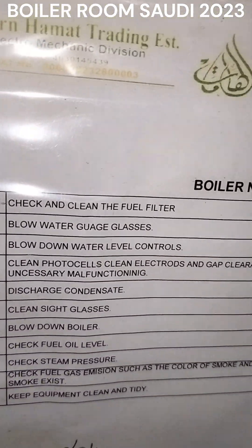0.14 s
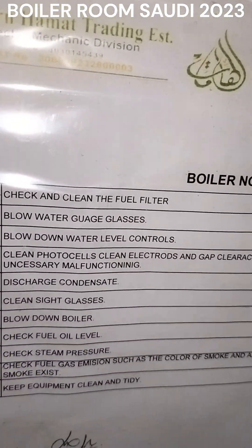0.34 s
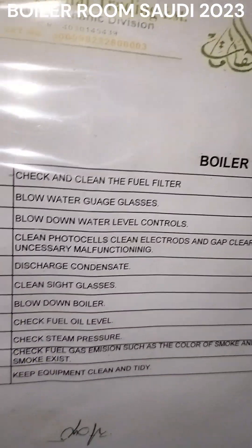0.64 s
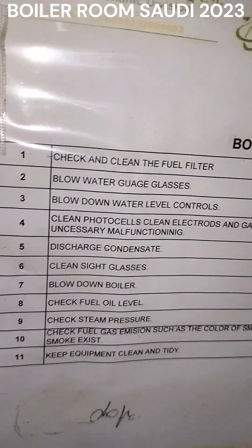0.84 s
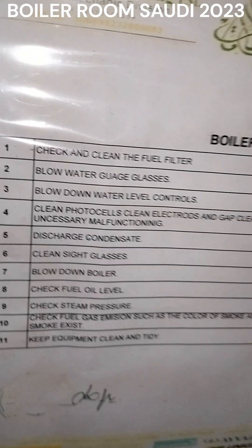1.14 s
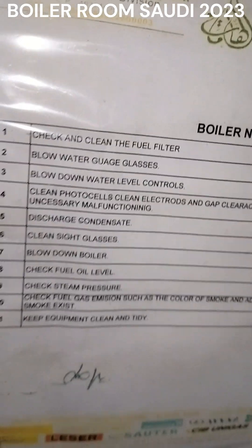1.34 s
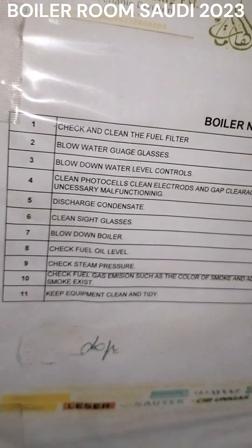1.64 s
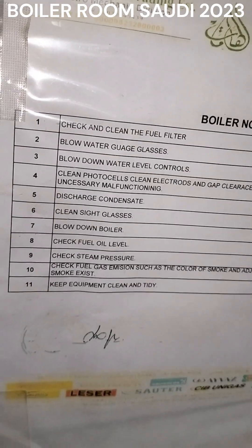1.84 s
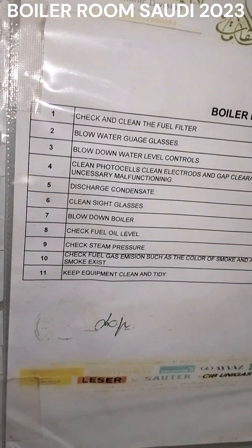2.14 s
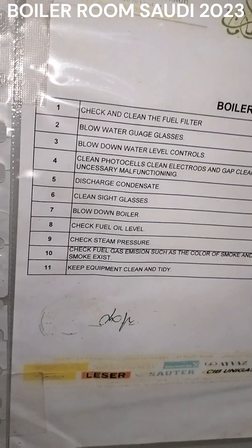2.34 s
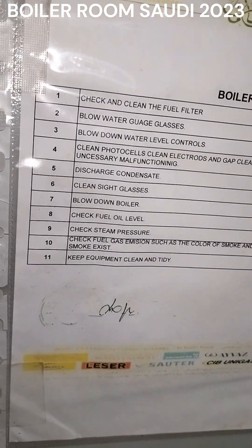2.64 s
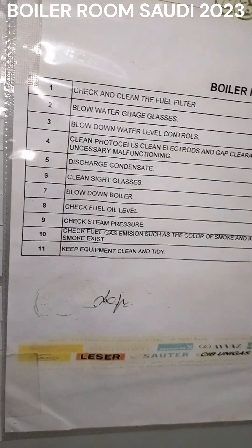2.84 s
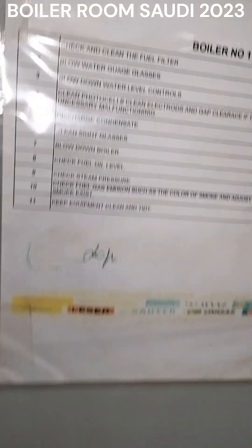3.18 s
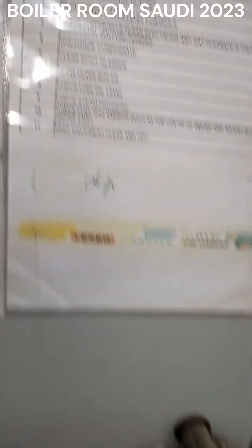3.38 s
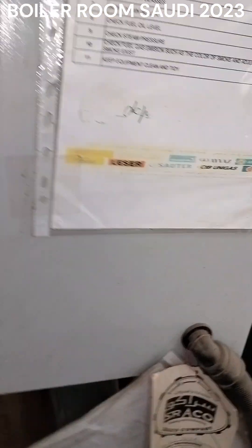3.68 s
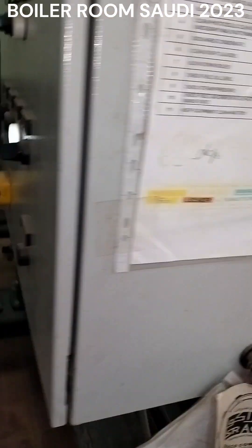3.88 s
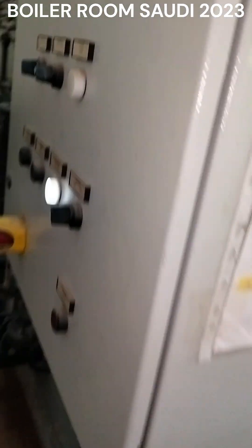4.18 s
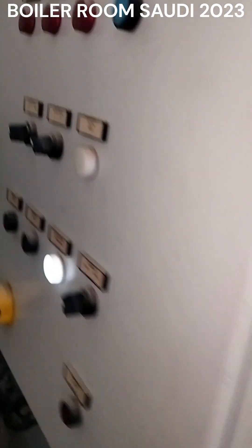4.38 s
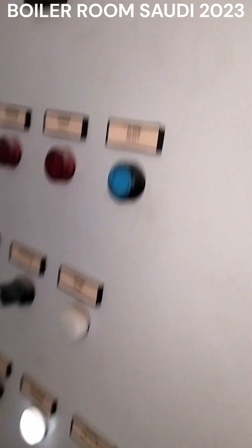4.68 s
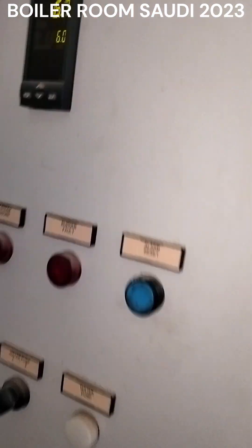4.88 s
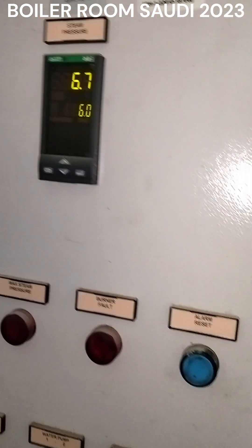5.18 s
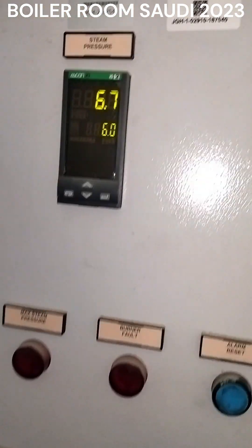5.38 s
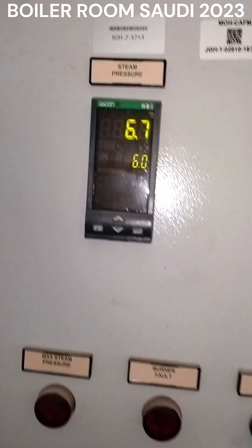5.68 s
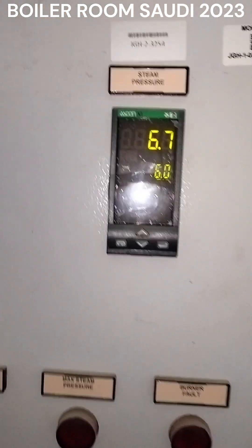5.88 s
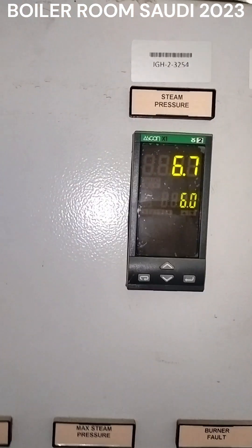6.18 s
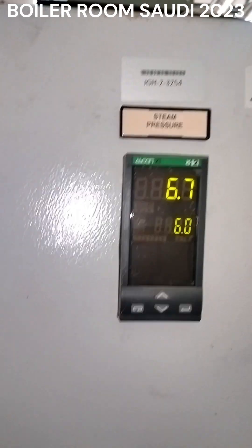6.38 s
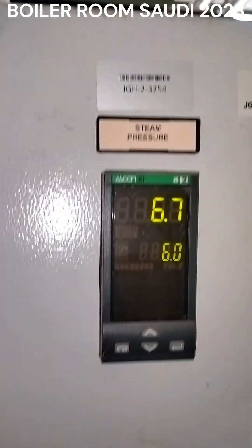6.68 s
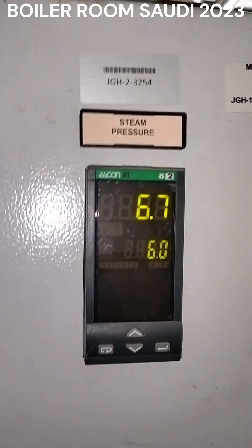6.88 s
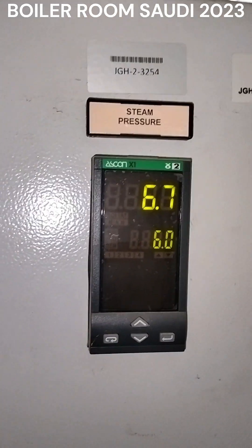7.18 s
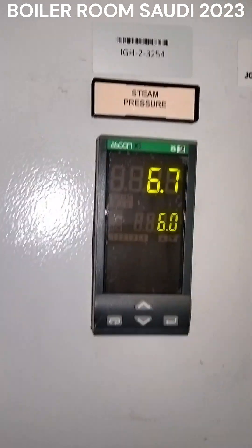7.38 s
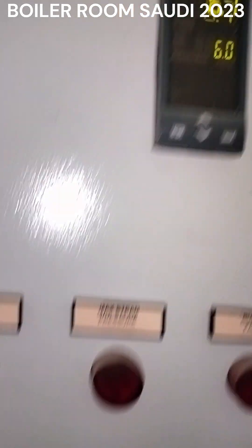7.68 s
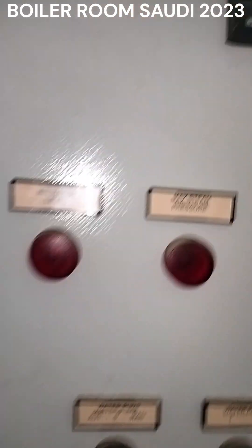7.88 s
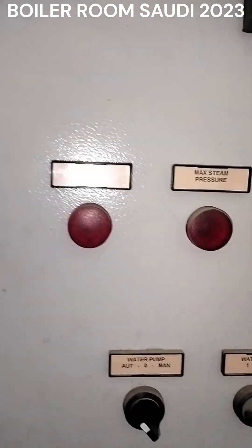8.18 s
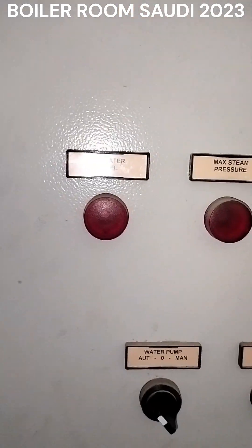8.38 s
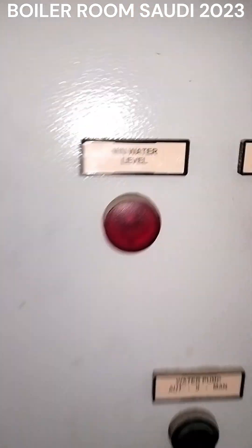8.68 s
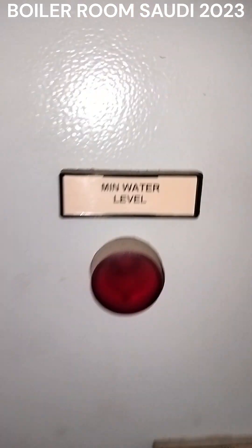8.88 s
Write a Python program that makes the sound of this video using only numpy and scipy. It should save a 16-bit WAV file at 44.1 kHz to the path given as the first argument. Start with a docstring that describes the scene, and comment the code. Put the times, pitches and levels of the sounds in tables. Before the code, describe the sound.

Close, moving stereo pickup in a boiler room: dense, broad burner roar with fluttering rumble, steady motor tones, faint buzz and a piercing whine that drifts between left and right. Just after four seconds, steel thumps, rings and clatters for a fraction of a second, mixed with a scratchy hiss. Its tail sinks quickly into the unbroken machinery noise, which continues to the end.

```python
"""Boiler room along the control cabinet

A steam boiler runs in a hard-walled room, heard from a microphone that moves along its control cabinet.
The burner roars as shaped noise; a blower whines and buzzes, and motors and pumps hum as sine tones
that swell and fade in the room's standing waves. Halfway through, sheet steel clunks and rattles once
as struck decaying modes and noisy clatter, with a short rasping hiss of noise and ticks amid it."""
import sys
import numpy as np
from scipy import signal
from scipy.fft import rfft, irfft
from scipy.io import wavfile
from scipy.ndimage import uniform_filter1d

SR = 44100
rng = np.random.default_rng(int(sys.argv[2]) if len(sys.argv) > 2 else 0)


def to_wav(sig):
    """Store sig (one row per channel, or 1-D mono) as 16-bit WAV at the path in sys.argv[1].

    Samples outside -1..1 are clipped; the rate is SR.
    """
    pcm = np.clip(np.atleast_2d(sig), -1, 1) * 32767
    pcm = np.round(pcm).astype(np.int16)
    wavfile.write(sys.argv[1], SR, pcm.T)  # frames by channels


N = 398223
T = np.arange(N) / SR
PORT_GAP_M = 0.19  # distance between the two microphone ports


def gain_of(db):
    """Decibels to amplitude."""
    return 10 ** (np.asarray(db) / 20)


def evened(x):
    """Scales a signal to an rms of one."""
    return x / np.sqrt(np.mean(abs(x) ** 2) + 1e-20)


def read(points, hz):
    """Reads a spectrum table on a log-frequency axis."""
    f, value = np.transpose(points)
    return np.interp(np.log(hz + 1), np.log(f + 1), value)


def curve(rows, axis):
    """One column of a time table, at every sample."""
    rows = np.array(rows)
    return np.interp(T, rows[:, 0], rows[:, axis])


def add(mix, s, sound):
    """Mixes a stereo sound in at time s."""
    part = mix[:, round(s * SR):][:, :sound.shape[1]]
    part += sound[:, :part.shape[1]]


def drift(rate):
    """Smooth random wander of rms one; its spectrum falls away above rate in Hz."""
    points, points_per_s = 2048, 200
    f = np.fft.rfftfreq(points, 1 / points_per_s)
    spectrum = rfft(rng.standard_normal(points)) / (1 + (f / rate) ** 2)
    slow = evened(irfft(spectrum))
    return np.interp(T, np.arange(points) / points_per_s, slow)


def likeness(hz):
    """Sound from all sides is alike at the two ports only when its waves are longer than their gap."""
    speed_m_s = 343
    alike = .98 * np.sinc(2 * hz * PORT_GAP_M / speed_m_s)
    return np.clip(alike / (1 + (hz / 2500) ** 2), -1, 1)


def diffuse(spectrum, ripple_db):
    """Stereo noise filling the room; the room's many modes ripple its spectrum."""
    hz = np.fft.rfftfreq(N, 1 / SR)
    a, b = rfft(rng.standard_normal((2, N)))
    same = likeness(hz)
    grid = np.arange(0, 8000, 14)  # Hz between ripple points

    def rippled(z):
        """Gives the spectrum random bumps, shallower in the bass."""
        bumps = np.interp(hz, grid, rng.standard_normal(len(grid)))
        return z * gain_of(ripple_db * bumps * hz / (hz + 400))

    mid = rippled(a * np.sqrt(1 + same))
    side = rippled(b * np.sqrt(1 - same))
    ports = np.array([mid + side, mid - side])
    return evened(irfft(ports * gain_of(read(spectrum, hz)), N))


# the burner's roar, spectrum shape only: pitch_hz, density_db (relative, per Hz)
ROAR_SPECTRUM = [(12, -52), (25, -44), (55, -27.5), (100, -16), (165, -5), (270, -0.5), (350, -5.5),
                 (1000, -4), (1450, -5.5), (1950, -15), (2650, -12.5), (3250, -16.5), (3600, -14.5),
                 (4200, -20.5), (4520, -27.5), (5100, -28), (5750, -31), (6500, -48.5), (7400, -61)]
# how much louder the roar is on the left than the right: pitch_hz, lean_db
ROAR_LEAN_BY_PITCH = [(100, 1), (600, 0.9), (1200, 3), (2000, 4), (2600, 1.5), (3500, 3.5), (4400, -0.5),
                      (5200, 1), (6400, -10.5)]
# slow changes of the roar along the cabinet: time_s, rumble_db, rush_db
ROAR_ALONG_PATH = [(0, 1, 0), (1, 2, .5), (2, 0.5, -0.1), (3.5, -.5, 0), (4.8, 0, 0), (5.4, 0, -0.9),
                   (6.2, -1, 0), (7.2, 0.5, -.5), (8.1, -1.5, -0.5), (9, 0, -0.7)]


def burner(level_db=-21.5, flutter_db=-0.5, colour_db=1.72):
    """The flame's rumble flutters under the even rush of air; standing waves slowly recolour the lower part."""
    hz, s, z = signal.stft(diffuse(ROAR_SPECTRUM, ripple_db=0.54), SR, nperseg=2048)
    hz = hz[:, None]
    at = np.minimum(np.round(s * SR).astype(int), N - 1)  # sample at each frame

    low = 1 / (1 + (hz / 380) ** 4)  # share of rumble against rush
    rumble_db = curve(ROAR_ALONG_PATH, axis=1) + flutter_db * drift(9.5)
    rush_db = curve(ROAR_ALONG_PATH, axis=2)

    # random patches, smoothed across pitch and then across time
    patches = rng.standard_normal(z.shape[1:])
    patches = uniform_filter1d(patches, size=4, axis=0)
    patches = evened(uniform_filter1d(patches, size=36, axis=1))

    db = low * rumble_db[at] + (1 - low) * rush_db[at]
    db = db + colour_db * patches / (1 + hz / 2500)
    lean_db = np.array([.5, -.5])[:, None, None] * read(ROAR_LEAN_BY_PITCH, hz)
    roar = signal.istft(z * gain_of(db + lean_db), SR, nperseg=2048)[1][:, :N]
    return gain_of(level_db) * roar


def room_tone(hz, fade_rate):
    """A steady tone whose level and phase wander at each port as it crosses the standing waves."""
    turn = 2 * np.pi * hz * T
    cos, sin = np.cos(turn), np.sin(turn)

    def wandering():
        """The tone with independently drifting cosine and sine parts."""
        return evened(evened(drift(fade_rate)) * cos + evened(drift(fade_rate)) * sin)

    mid = wandering() * np.sqrt((1 + likeness(hz)) / 2)
    side = wandering() * np.sqrt((1 - likeness(hz)) / 2)
    return np.array([mid + side, mid - side])


# lesser tones of the motors, pumps and pipes: pitch_hz, level_db (rms)
LESSER_TONES = [(152.1, -50), (176.3, -42.5), (188.4, -44.5), (321.5, -44.5), (388.5, -44.5), (421, -47),
                (600.2, -44), (617.7, -40.5), (823.6, -57), (1271.8, -43), (1306.8, -43), (1325.6, -40.5),
                (1362.0, -39), (1388, -46), (1415.8, -46.5), (1453.5, -41.5), (1545.0, -50.5),
                (1561.2, -50), (1816.9, -46.5), (1908.4, -48.5), (2061.8, -54), (2527.5, -45.5),
                (2643.2, -49), (3528.8, -52)]


def machines():
    """The many lesser tones of motors, pumps and pipes, each wandering in the standing waves."""
    return sum(gain_of(db) * room_tone(hz, fade_rate=2.58) for hz, db in LESSER_TONES)


# stronger machine tones along the path: pitch_hz, then a list of time_s, level_db (rms, before waver)
SWELLING_TONES = [(239.6, [(0.15, -34), (1.4, -33.5), (2.0, -39.5), (3.0, -32.5), (4.3, -53.5),
                  (6.2, -29.5), (7.0, -42.5), (8.0, -32), (9.0, -46)]), (265.1, [(0.0, -38), (0.9, -35.5),
                  (1.5, -30.5), (2.1, -38.5), (4.3, -39.5), (5.5, -46), (7.4, -36.5), (8.4, -31.5),
                  (9.0, -35)]), (359.3, [(0.0, -45), (1.8, -43.5), (2.35, -34), (2.7, -44), (4.0, -43),
                  (5.0, -43.5), (9.0, -44)]), (478.0, [(4.6, -59), (4.95, -40.5), (5.15, -40), (5.5, -56)]),
                  (508.7, [(0.0, -42), (2.0, -40.5), (4.8, -39), (5.25, -35.5), (5.55, -45), (6.3, -40.5),
                  (6.8, -37.5), (7.5, -49), (9.0, -45.5)]), (528.9, [(0.0, -44), (0.4, -44), (0.67, -33.5),
                  (0.9, -43), (1.2, -42), (1.45, -34.5), (2.3, -49), (8.2, -47.5), (9.0, -40.5)]),
                  (628.5, [(0.0, -40.5), (1.3, -36.5), (2.5, -34.5), (3.4, -35), (4.1, -43), (4.6, -33.5),
                  (5.4, -51), (6.05, -32), (6.7, -35.5), (7.4, -44.5), (9.0, -41)])]


def swelling(waver_db=2.04, wander=1.0, spread=0.92):
    """The stronger machine tones waver in level and phase; the shorter their waves, the more the ports differ."""
    out = np.zeros((2, N))
    for hz, path in SWELLING_TONES:
        turn = 2 * np.pi * hz * T + wander * drift(2)
        apart = spread * np.sqrt((1 - likeness(hz)) / 2) * drift(0.56)  # radians
        level = gain_of(curve(path, axis=1) + waver_db * drift(8))
        out += level * evened(np.sin([turn + apart, turn - apart]))
    return out


# the pump's hum along the path: time_s, level_db (before trim and waver)
PUMP_ALONG_PATH = [(0.0, -26), (0.28, -30), (0.43, -26), (0.65, -37), (1.0, -31), (1.26, -46), (2.2, -43),
                   (2.62, -31.5), (3.33, -34.5), (4.04, -27.5), (4.55, -31.5), (5.25, -35.5), (5.7, -39),
                   (6.0, -33.5), (7.09, -28), (7.7, -31), (8.1, -26.5), (8.4, -32.5), (8.58, -26.5),
                   (8.76, -39.5), (8.98, -27.5)]
# the motor's drone along the path: time_s, level_db (before trim)
DRONE_ALONG_PATH = [(0.0, -57), (0.65, -58), (1.76, -45), (3.19, -59), (5.03, -48.5), (7.55, -63.5),
                    (9.02, -53)]
HUM_HZ, DRONE_HZ = 205.9, 88.8


def hum(pump_trim_db=-0.5, drone_trim_db=-0.5, waver_db=0.8):
    """A pump's vanes hum, wavering a little, over a motor's deeper drone; their long waves swell and fade."""
    pump_level = gain_of(curve(PUMP_ALONG_PATH, axis=1) + pump_trim_db + waver_db * drift(5))
    pump = pump_level * evened(np.sin(2 * np.pi * HUM_HZ * T + 0.22 * drift(2.2)))
    drone_level = gain_of(curve(DRONE_ALONG_PATH, axis=1) + drone_trim_db)
    drone = drone_level * evened(np.sin(2 * np.pi * DRONE_HZ * T + .3 * drift(0.86)))
    return (pump + drone) * gain_of([[.4], [-.4]])  # slightly to the left


# the blower's whine in the standing waves along the path:
# time_s, level_db (before trim and flutter), left_minus_right_db, left_lead_cycles
WHINE_ALONG_PATH = [(0.0, -39, 15, 0.077), (0.36, -25, 8.5, -0.39), (1.0, -22.5, 4.5, -0.24),
                    (1.4, -29.5, 2, -0.13), (1.95, -31, 3, -0.13), (2.45, -31.5, 0, -0.33),
                    (2.65, -26, 1, -0.25), (2.93, -25, 1.5, -0.22), (3.35, -26, -3, -0.22),
                    (3.79, -33, 1, -0.1), (3.93, -22.5, 4, 0.2), (4.08, -28, 7, 0), (4.35, -35.5, 3, 0.1),
                    (4.58, -27, 0, 0.25), (4.69, -44, 0, -0.09), (4.78, -25, 5, -0.18),
                    (4.89, -25, -2, 0.13), (5.05, -36, -7, 0.19), (5.21, -24, -6, 0.29),
                    (5.52, -33, -5.5, 0.33), (5.85, -26.5, 0.5, -0.093), (6.17, -31, 0, 0.27),
                    (6.7, -24, 10, -0.39), (6.97, -26.5, 12, -0.33), (7.45, -28.5, 18, -0.61),
                    (7.75, -27.5, 21, -0.9), (8.04, -23, -3.5, -0.75), (8.35, -24, 1, -0.76),
                    (8.6, -22.5, -2, -0.62), (8.85, -33, -4, -0.83), (9.02, -34, -2, -0.9)]
WHINE_HZ = 1296.2


def whine(trim_db=0.1, flutter=0.036, flutter_db=0.3):
    """The blower's blade tone, shaken by turbulent air; the standing waves share it out between the ports."""
    turn = 2 * np.pi * WHINE_HZ * T + .5 * drift(0.57)
    lean_db = curve(WHINE_ALONG_PATH, axis=2)
    lead = 2 * np.pi * curve(WHINE_ALONG_PATH, axis=3)  # radians
    share = gain_of([lean_db / 2, -lean_db / 2])
    share = share / np.sqrt(np.mean(share ** 2, axis=0))  # leaning leaves the total power alone
    ports = np.array([evened(np.sin(turn + side * lead / 2 + flutter * drift(11))) for side in (1, -1)])
    level = gain_of(curve(WHINE_ALONG_PATH, axis=1) + trim_db + flutter_db * drift(21))
    return level * share * ports


SHAFT_HZ = 29.61


def fan_buzz(level_db=-39, centre_hz=2400, octaves=0.42):
    """The uneven fan wheel repeats the same rush of air at every turn: a comb of shaft orders."""
    orders = np.arange(1, 2049)
    order_hz = orders * SHAFT_HZ
    bell = np.exp(-.5 * (np.log2(order_hz / centre_hz) / octaves) ** 2)
    shape = bell * gain_of(read(ROAR_SPECTRUM, order_hz))
    turns = SHAFT_HZ * T + 0.0015 * drift(0.93)
    out = np.zeros((2, N))
    for ear in (0, 1, 0, 1):  # two slowly fading patterns per side
        chance = rng.standard_normal(len(orders)) + 1j * rng.standard_normal(len(orders))
        one_turn = evened(irfft(np.r_[0, shape * chance]))
        place = np.arange(len(one_turn)) / len(one_turn)
        out[ear] += drift(0.59) * np.interp(turns % 1, place, one_turn)
    return gain_of(level_db) * evened(out) * gain_of([[1], [-1]])


# blows on the sheet steel, levels relative:
# start_s, thump_db (low modes), thump_pitch_hz (favoured), ring_db (high modes), ring_pitch_hz (favoured),
# clatter_db
STEEL_BLOWS = [(4.34, -8, 259, -24, 900, -20), (4.349, -13.5, 380, -3, 950, -16),
               (4.356, -16, 400, -7, 1300, -17), (4.366, -13, 450, -18, 2100, -19),
               (4.384, -10, 100, -23, 1400, -28), (4.392, -16.5, 300, -17, 1300, -23.5),
               (4.406, -11, 129, -12, 1100, -23), (4.441, -19, 151, -21, 1700, -29),
               (4.466, -9, 240, -19, 1700, -32), (4.499, -21, 400, -21, 1410, -37),
               (4.524, -30, 400, -18.5, 1300, -29), (4.552, -18, 300, -19.5, 1250, -29)]
# modes the steel rings with: pitch_hz (before detuning), level_db (relative), t60_s
STEEL_MODES = [(109, -6, 0.26), (163, -7, 0.19), (226.7, -8.5, 0.44), (265.4, 4.5, 0.18), (288, -8, 0.91),
               (396.4, -1.5, 0.27), (470, -7.5, 0.15), (646, -15, 0.09), (812, -6.5, 0.047),
               (954, -7, 0.072), (1083, -3, 0.084), (1310, -8, 0.068), (1397, -6, 0.17), (1680, -4.5, 0.15),
               (1796, -5, 0.23), (2500, -9, 0.2)]
# the clatter of each blow, spectrum shape only: pitch_hz, density_db (relative, per Hz)
CLATTER_SPECTRUM = [(40, -34), (55, -25), (90, 0), (300, 0), (550, -7), (1000, -5), (1750, -1.5),
                    (2000, -3.5), (2400, -6), (2900, -13), (4200, -14), (6000, -39), (7000, -58)]
THUMP_BELOW_HZ = 500  # modes below this thump, the others ring


def favoured(hz, centre_hz, octaves):
    """Weights a mode by how near it lies to the pitch that the struck place favours."""
    return 1 / np.hypot(1, np.log2(hz / centre_hz) ** 2 / octaves ** 2)


def clunk(modes_db=-4, clatter_t60=0.29, room_db=-12, room_t60=2.1, rise_s=0.0044, uneven_db=-0.5,
          lean_db=2.0, thump_octaves=0.41, ring_octaves=0.8, detune=0.0068, rattle_db=2.0):
    """A steel panel is struck and rattles back; heavy blows thump, hard ones ring, each favouring other modes."""
    t, out = T[:SR], np.zeros((2, N))
    clatter = diffuse(CLATTER_SPECTRUM, ripple_db=2.5) * evened(gain_of(rattle_db * drift(60)))
    # a quick fall, then the quieter, slower tail of the room
    fall = np.hypot(gain_of(-60 * t / clatter_t60), gain_of(room_db - 60 * t / room_t60))
    lean = gain_of([[lean_db], [-lean_db]])
    for k, (s, thump_db, thump_hz, high_db, high_hz, hard_db) in enumerate(STEEL_BLOWS):
        noise = clatter[:, k * SR // 2:][:, :SR]  # a different stretch for each blow
        blow = gain_of(hard_db) * lean * fall * noise
        for hz, mode_db, t60 in STEEL_MODES:
            mode_hz = hz * (1 + detune * rng.standard_normal())
            phase = rng.random((2, 1)) * (1 - likeness(hz)) / 2  # cycles, one per port
            tone = np.sin(2 * np.pi * (mode_hz * t + phase))
            if hz < THUMP_BELOW_HZ:
                force = gain_of(thump_db) * favoured(hz, thump_hz, thump_octaves)
            else:
                force = gain_of(high_db) * favoured(hz, high_hz, ring_octaves) * lean
            decay_db = modes_db + mode_db + uneven_db * rng.standard_normal() - 60 * t / t60
            blow = blow + force * gain_of(decay_db) * tone
        add(out, s, (1 - np.exp(-t / rise_s)) * blow)
    return out


# the hiss during the clunk, spectrum shape only: pitch_hz, density_db (relative, per Hz)
HISS_SPECTRUM = [(300, -24), (1650, 1.5), (2000, 2), (2450, 4), (2900, -3), (3600, 1.5), (4200, -4),
                 (4800, -10), (5800, -12.5), (6400, -27), (7000, -43)]
# sharp ticks within the rasp: start_s, level_db (before the lean to the left)
RASP_TICKS = [(4.376, -21), (4.4095, -20), (4.424, -18), (4.4495, -15)]


def hiss(peak_s=4.44, level_db=-21, rise_s=0.053, t60=0.55, tick_t60=0.015):
    """A short rasp with a few ticks; it swells just after the first blows, amid the clunk, and dies in the room."""
    swell = np.exp(-.5 * (np.minimum(T - peak_s, 0) / rise_s) ** 2)
    fall = gain_of(level_db - 60 * np.maximum(T - peak_s, 0) / t60)
    ticks = sum((T >= s) * gain_of(db - 60 * abs(T - s) / tick_t60) for s, db in RASP_TICKS)
    level = np.hypot(swell * fall, ticks)
    return level * diffuse(HISS_SPECTRUM, ripple_db=6.0) * gain_of([[1.5], [-1.5]])


def scene():
    """Everything in the boiler room."""
    steady = burner() + machines() + swelling() + hum() + whine() + fan_buzz()
    return steady + clunk() + hiss()


def record(dry):
    """The recorder rounds off the highest peaks, then limits the band steeply."""
    ceiling, edge_hz = .88, 7250
    rounded = dry / (1 + (dry / ceiling) ** 8) ** (1 / 8)
    lowpass = signal.firwin(511, edge_hz, window=("kaiser", 9), fs=SR)
    return signal.oaconvolve(rounded, lowpass[None], "same")


dry = scene()
out = record(dry)
to_wav(out)
```